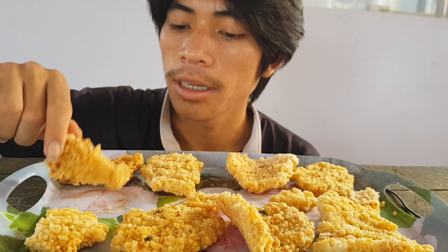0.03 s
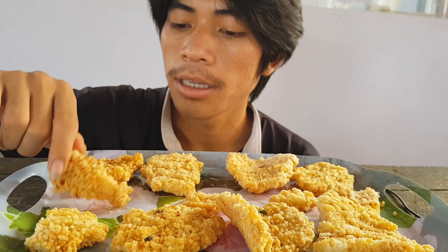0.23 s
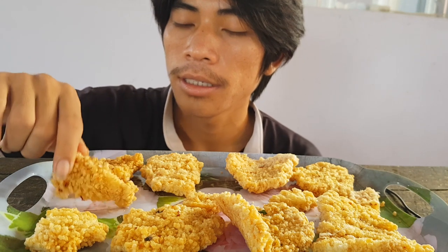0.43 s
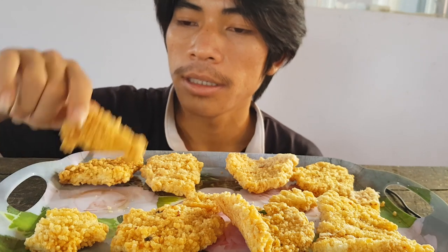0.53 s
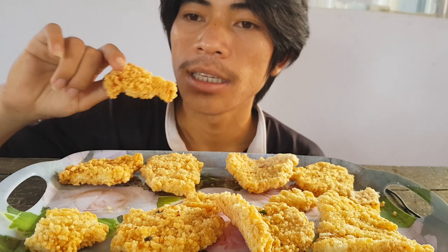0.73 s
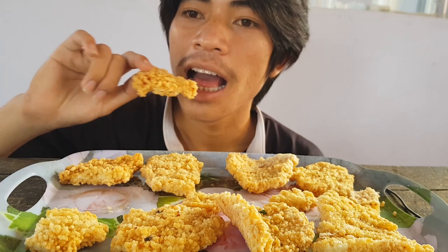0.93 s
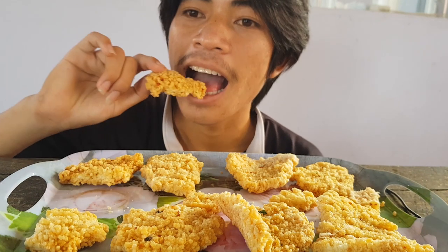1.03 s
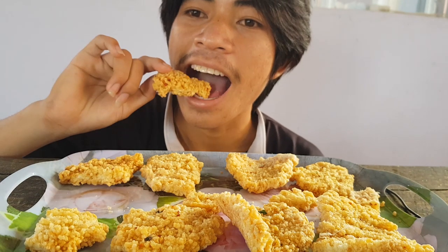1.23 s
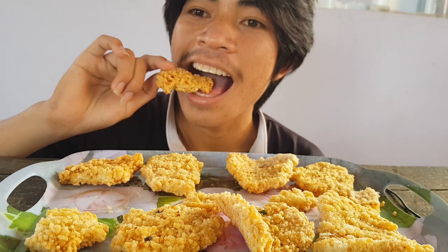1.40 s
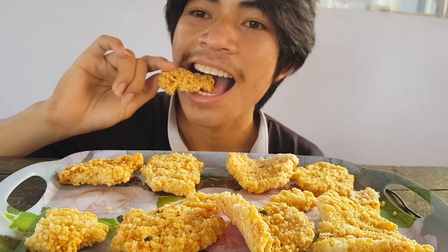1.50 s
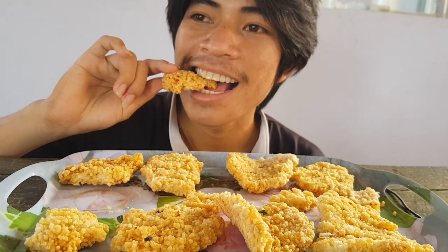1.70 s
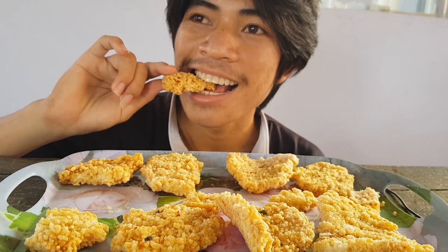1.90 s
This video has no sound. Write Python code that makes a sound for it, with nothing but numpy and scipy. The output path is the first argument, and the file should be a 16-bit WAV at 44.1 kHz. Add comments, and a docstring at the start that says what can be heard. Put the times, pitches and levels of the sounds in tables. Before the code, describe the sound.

A hard crispy piece of food raps a tray twice, very close and overloaded, with a short clattering ring and table thud; after a quiet pause, teeth crunch into the crust in a small room.

```python
"""In a small room, a crisp rice cake is knocked twice on a tray close to the microphone, overloading it.
Each blow snaps, rings the tray and the table as struck modes, and leaves a tail of dying noise bands.
Then the cake is lifted and bitten: grains of noise fizz as crust under the teeth, and a quick run of
short noise bursts cracks it, each ringing against the teeth and in the open mouth.
Around this lie a quiet hiss, a low rumble, a faint hum, small ticks and the rustle and bumps of handling."""
import sys
import numpy as np
from scipy import signal
from scipy.fft import rfft, irfft
from scipy.io import wavfile

SR = 44100
rng = np.random.default_rng(int(sys.argv[2]) if len(sys.argv) > 2 else 0)


def unload_audio(sound):
    """Save the sound as a 16-bit wav file, at the path given as the first command line argument."""
    columns = np.transpose(np.atleast_2d(sound))
    # keep every value between -1 and 1, then stretch to whole-number steps
    steps = np.round(np.clip(columns, -1, 1) * 32767)
    wavfile.write(sys.argv[1], SR, steps.astype(np.int16))


N = 85995
T = np.arange(N) / SR  # time [s]


def from_db(db):
    """Decibels to gain."""
    return 10 ** (np.asarray(db) / 20)


def rms_one(x):
    """Scale to rms 1."""
    return x / np.sqrt(np.mean(x ** 2) + 1e-20)


def level(rows):
    """A curve of (time [s], level [dB]) as gain at every sample."""
    return from_db(np.interp(T, *np.transpose(rows)))


def at_hz(rows, hz, axis=1):
    """Read a column of a table on a log-frequency axis."""
    rows = np.array(rows)
    return np.interp(np.log(hz), np.log(rows[:, 0]), rows[:, axis])


def delayed(x, s):
    """The sound x, started at time s."""
    return np.concatenate([np.zeros(max(int(s * SR), 0)), x])[:N]


def decay(s, t60):
    """Exponential decay by 60 dB in t60 seconds."""
    return np.exp(-np.log(1000) * s / t60)


def build_up(rise_s):
    """A resonance gathers energy: an exponential approach to 1."""
    return 1 - np.exp(-T / rise_s)


def mode(hz, t60):
    """A struck mode: a decaying sine whose envelope starts at 1."""
    return np.sin(2 * np.pi * hz * T) * decay(T, t60)


def white_noise():
    """White noise of rms 1."""
    return rng.standard_normal(N)


def noise_pair():
    """Two independent white noises of rms 1."""
    return rng.standard_normal((2, N))


def filtered(x, order, hz, kind):
    """Butterworth filter."""
    return signal.sosfilt(signal.butter(order, hz, kind, fs=SR, output="sos"), x)


def coloured(x, spectrum):
    """Causal (minimum-phase) filter with this relative spectrum; white noise keeps its level."""
    hz = np.maximum(np.arange(N + 1) * SR / (2 * N), 1)
    gain = rms_one(from_db(at_hz(spectrum, hz)))
    # Folding the cepstrum onto positive time gives the minimum phase.
    cepstrum = irfft(np.log(gain))
    cepstrum[1:N] *= 2
    cepstrum[N + 1:] = 0
    response = np.exp(rfft(cepstrum))
    return irfft(rfft(x, 2 * N) * response)[:N]


def dying_noise(table, white, hold_s):
    """Countless close modes: third-octave bands of noise, each held and then dying at its own rate."""
    out = 0
    edges = 43 * 2 ** (np.arange(27) / 3)
    for k, (low, high) in enumerate(zip(edges, edges[1:])):
        if high > table[0][0]:
            hz = np.sqrt(low * high)
            band = rms_one(filtered(white[k % 2], 3, [low, high], "band"))
            envelope = decay(np.maximum(T - hold_s, 0), at_hz(table, hz, axis=2))
            out = out + from_db(at_hz(table, hz)) * band * envelope
    return out


def grains():
    """A dense stream of tiny fractures of uneven size, at rms 1."""
    grains_per_s, spread_db = 10000, 2.9
    sizes = from_db(spread_db * np.minimum(rng.exponential(1, N), 5)) * rng.choice([-1, 1], N)
    return rms_one(sizes * (rng.random(N) < grains_per_s / SR))


def fracture(length_s):
    """A burst of micro-clicks, as of a crack through crust: noise that dies within milliseconds."""
    burst = white_noise() * np.exp(-T / length_s)
    energy = length_s * SR / 2
    return burst * np.sqrt(energy / np.sum(burst ** 2))


# Steady hiss of the quiet room: (frequency [Hz], relative density [dB per Hz])
AIR_COLOUR = [(100, -13), (220, -22), (320, -18), (550, -26), (800, -28.5), (1100, -32.5), (2200, -31.5),
              (3200, -25.5), (5000, -26), (8000, -33), (15500, -46)]


def room_hiss():
    """The faint steady hiss of the quiet room is shaped noise."""
    return from_db(-66) * coloured(white_noise(), AIR_COLOUR)


# Low rumble before the microphone's low cut: (time [s], level [dB])
RUMBLE_LEVEL = [(0, -65.5), (0.15, -104.5), (0.4, -55), (0.72, -61.5), (0.82, -64.5), (1.07, -58),
                (1.3, -69), (1.6, -72.5), (1.95, -56.5)]
# Its colour: (frequency [Hz], relative density [dB per Hz])
RUMBLE_COLOUR = [(25, -30.5), (50, -14), (75, 1), (110, -21.5), (200, -23.5), (400, -29.5), (800, -32),
                 (2000, -45)]


def rumble():
    """Low shaped noise rises and falls."""
    return level(RUMBLE_LEVEL) * coloured(white_noise(), RUMBLE_COLOUR)


# A dull noise dying from the start: (frequency [Hz], level [dB], t60 [s])
SETTLING = [(100, -64, .5), (170, -66, .7), (404, -65, .8), (900, -70, .35), (1399, -69, .7),
            (2202, -89, .5)]


def settling():
    """A dull noise dies away at the start, each band at its own rate."""
    return dying_noise(SETTLING, noise_pair(), 0)


# Faint low hum: (time [s], frequency [Hz], level [dB])
HUM_PATH = [(1.36, 336.5, -81.5), (1.44, 344.6, -67.5), (1.52, 340.3, -69), (1.57, 338, -77),
            (1.62, 310, -60.5), (1.67, 313, -90), (1.75, 311.4, -76), (1.95, 299, -56)]


def hum():
    """A faint low sine drifts in pitch while its level swells, dips and wavers irregularly."""
    waver_depth, waver_hz = 0.39, 25
    s, hz, db = np.transpose(HUM_PATH)
    waver = rms_one(filtered(white_noise(), 2, waver_hz, "low"))
    tone = np.sqrt(2) * np.sin(2 * np.pi * np.cumsum(np.interp(T, s, hz)) / SR)
    return (T > s[0]) * from_db(np.interp(T, s, db)) * (1 + waver_depth * waver) * tone


# Soft rustle of the hand over the tray: (time [s], level [dB])
RUSTLE_LEVEL = [(0, -78), (0.08, -71), (0.17, -63), (0.205, -52), (0.24, -61), (0.40, -69), (0.62, -68.5),
                (0.75, -88.5)]
# Its colour: (frequency [Hz], relative density [dB per Hz])
RUSTLE_COLOUR = [(200, -2), (700, -5), (1500, -10.5), (3000, -11.5), (5000, -1), (7500, -4), (12000, -20.5),
                 (15000, -26.5)]


def rustle():
    """The hand rustles over the tray as a stream of coloured grains."""
    end_s = 0.9
    return (T < end_s) * level(RUSTLE_LEVEL) * coloured(grains(), RUSTLE_COLOUR)


# Dull bumps of the hand and jaw: (time [s], level [dB], frequency [Hz])
BUMPS = [(0.625, -40.5, 72), (1.77, -32, 55), (1.829, -37.5, 50.8)]


def bumps():
    """The hand and jaw bump softly: low modes that build up and die."""
    t60_s, rise_s = 0.15, 0.01
    out = 0
    for s, db, hz in BUMPS:
        out = out + delayed(from_db(db) * mode(hz, t60_s) * build_up(rise_s), s)
    return out


# Small ticks: crumbs, light touches before the blows and a click of the lips:
# (time [s], level [dB], centre frequency [Hz])
SMALL_TICKS = [(0.173, -50.5, 4550), (0.207, -28, 2496), (0.2335, -34, 7500), (0.235, -45, 7400),
               (0.356, -58, 4940), (0.4103, -29, 2107), (1.1622, -50, 8000)]


def small_ticks():
    """Crumbs, light touches before the blows and a click of the lips: short bursts, each in its own band."""
    length_s, width = 0.002, 0.28  # width as a share of the centre frequency
    out = 0
    for s, db, hz in SMALL_TICKS:
        edges = [hz / (1 + width / 2), hz * (1 + width / 2)]
        make_up = np.sqrt(SR / (np.pi * hz * width))  # a narrow band passes less energy
        tick = filtered(fracture(length_s), 2, edges, "band") * make_up
        out = out + delayed(from_db(db) * tick, s)
    return out


# Room tail, relative to the blow: (frequency [Hz], level [dB], t60 [s])
ROOM_TAIL = [(61, -52, .23), (150, -44, .38), (410, -41, .4), (850, -52, .45), (1600, -47.5, .48),
             (2400, -47.5, .47), (3600, -52, .8), (4900, -52, .7), (5900, -65, .75), (7140, -65.5, .85),
             (10913, -68.5, .33), (15000, -74, .3)]
# Resonances lingering in that tail: (frequency [Hz], level [dB], t60 [s])
ROOM_MODES = [(282, -41, .42), (462, -39, .42), (545, -41, .38), (1252, -46, .35), (1785, -48, .3)]


def room_tail():
    """The small room answers a blow with dying noise and a few lingering modes."""
    lingering = sum(from_db(db) * mode(hz, t60) for hz, db, t60 in ROOM_MODES)
    diffuse = dying_noise(ROOM_TAIL, noise_pair(), 0)
    return (lingering + diffuse) * build_up(0.004)


def table_boom():
    """The table under the tray booms as one low mode that builds up slowly."""
    return from_db(-23) * mode(77.5, 0.29) * build_up(0.012)


def tray_thud():
    """The heavy thud of the tray against the table: a low sine under a short hump."""
    hz, length_s = 218, 0.012
    hump = np.sin(np.pi * np.sqrt(np.clip(T / length_s, 0, 1)))
    return from_db(-5.5) * np.sin(2 * np.pi * hz * T) * hump


# Tray modes, relative to the blow:
# (frequency [Hz], level at the first spot [dB], level at the second spot [dB], t60 [s])
TRAY_MODES = [(123, -22.5, -23.5, .15), (165, -16.5, -11, 0.11), (197, -20, -23.5, 0.069),
              (252, -16.5, -15, 0.13), (296, -16, -22, 0.077), (339.9, -12.5, -22, .1),
              (409.6, -11, -8, 0.098), (438.7, -5.5, -9.5, 0.082), (568, -18, -16, .12),
              (681, -11, -24.5, .07), (742.5, -28, -23.5, 0.061), (867, -29, -15, .075),
              (1063, -14.5, -16, .07), (1112, -15.5, -13, 0.068), (1200, -30.5, -16, .06),
              (1265.3, -17, -15.5, .085), (1521, -18.5, -19.5, 0.071), (1709.4, -30.5, -16.5, .05),
              (1785, -14, -18, .055), (1900, -22.5, -14, 0.041), (1963, -12, -21.5, 0.058),
              (2193, -11.5, -7.5, .045), (2407, -27, -13.5, 0.028), (2624, -11, -11, .046),
              (2898, -11.5, -9.5, .04), (3326, -16.5, -19, .04), (3722, -8.5, -15.5, 0.039),
              (4166, -13.5, -16.5, .03), (4890, -16.5, -17, 0.046)]


def tray(spot):
    """The tray rings at once in its upper modes; its low modes build up and the thud follows late."""
    lag_s, push_s, push_below_hz = 0.0014, 0.0044, 620
    low, high = 0, 0
    for k, (hz, *spot_db, t60) in enumerate(TRAY_MODES):
        ring = from_db(spot_db[spot]) * mode(hz, t60)
        if hz < push_below_hz:
            low = low - ring
        else:
            high = high + (-1) ** k * ring  # alternate signs of motion
    return high + delayed(low * build_up(push_s) - tray_thud(), lag_s)


# Dense upper modes of tray and cake: (frequency [Hz], relative level [dB], t60 [s])
CLATTER = [(304.1, -19, 0.11), (450, -14, 0.047), (695, -21.5, 0.1), (1350, -19.5, 0.045),
           (2800, -19, 0.064), (4600, -16.5, .042), (5900, -27.5, .04), (9400, -42.5, .028),
           (14800, -51, 0.057)]


def clatter(pattern):
    """Tray and cake clatter: held, then dying noise with only a small share common to both blows."""
    hold_s, change = 0.0082, 0.94  # change: share of the pattern's power that is new at each blow
    white = np.sqrt(1 - change) * pattern + np.sqrt(change) * noise_pair()
    return dying_noise(CLATTER, white, hold_s)


# Snap of the cake's hard edge: (frequency [Hz], relative density [dB per Hz])
CONTACT_COLOUR = [(300, -2.5), (1800, 5.5), (4000, -7), (8000, -4), (15000, -23)]


def contact():
    """The hard edge of the cake snaps on contact: a coloured fracture."""
    return from_db(-9.5) * coloured(fracture(0.0015), CONTACT_COLOUR)


# Blows close to the microphone, each at another spot of the tray:
# (time [s], level [dB], clatter level [dB], table boom level [dB]), the last two relative to the blow
KNOCKS = [(0.2100, -1.5, -2, 0), (0.4149, 0, -2.5, -1.5)]


def knocks():
    """Each blow snaps on contact and rings the tray, the table under it and the room."""
    out, pattern, table = 0, noise_pair(), table_boom()
    for spot, (s, db, clatter_db, boom_db) in enumerate(KNOCKS):
        blow = contact() + tray(spot) + room_tail()
        blow = blow + from_db(clatter_db) * clatter(pattern)
        blow = blow + from_db(boom_db) * table
        out = out + delayed(from_db(db) * blow, s)
    return out


# Fine fizz of crust under pressure: (time [s], level [dB])
FIZZ_LEVEL = [(1.598, -76), (1.608, -57), (1.66, -51.5), (1.72, -53), (1.79, -53), (1.83, -54.5),
              (1.868, -58.5), (1.90, -47.5), (1.93, -45.5), (1.95, -53)]
# Its colour: (frequency [Hz], relative density [dB per Hz])
FIZZ_COLOUR = [(120, -13.5), (200, -8), (320, -1.5), (500, -10.5), (850, -9.5), (1600, -6.5), (2400, -4),
               (4000, -2.5), (5200, -5), (6700, -7.5), (8200, -14), (11000, -24), (15500, -29)]


def fizz():
    """The crust fizzes under the teeth: a dense stream of coloured grains."""
    return level(FIZZ_LEVEL) * coloured(grains(), FIZZ_COLOUR)


# Bright ring of crust against teeth: (frequency [Hz], relative level [dB], t60 [s])
TOOTH_MODES = [(5460, 1.5, 0.0057), (5900, 2, 0.0051), (6380, 5, 0.0053), (7150, -14, 0.0066)]


def tooth_ring():
    """Crust against teeth rings in a few bright, very short modes of alternating sign."""
    return sum((-1) ** k * from_db(db) * mode(hz, t60) for k, (hz, db, t60) in enumerate(TOOTH_MODES))


def mouth_ring():
    """The open mouth cavity rings as one mode that builds up quickly."""
    return mode(1423, 0.016) * build_up(0.00026)


# The crust cracks under the teeth: (time [s], level [dB], mouth ring [dB], tooth ring [dB], length [s]),
# both rings relative to the crack
CRACKS = [(1.679, -55, -20, 9, 0.00082), (1.692, -46, -26, 6, 0.0014), (1.7315, -50, -6, 5.5, 0.00081),
          (1.7897, -44.5, -14, 5, 0.00087), (1.7988, -43, -4, 7.5, 0.00042),
          (1.8001, -36.5, -11.5, -1.5, .0006), (1.8766, -23, -18, 3.5, 0.0049),
          (1.8776, -14.5, 3.5, -28, .0016), (1.8803, -27.5, -4, 3, 0.0016), (1.8889, -36.5, 3, 9, 0.00028),
          (1.9024, -32.5, 2, 1, .0011), (1.9066, -35.5, -3, 4.5, 0.00073), (1.9137, -21, -6, -6, 0.002),
          (1.9143, -30.5, -5, -1, 0.0006), (1.916, -25.5, -8, 2, 0.0022),
          (1.9226, -26.5, -0.5, -2, 0.00076), (1.9273, -21.5, 0.5, -12, 0.00078)]
# Colour of a fracture: (frequency [Hz], relative density [dB per Hz])
CRACK_COLOUR = [(200, -24.5), (600, -8), (1100, -2), (2100, -1.5), (3000, 6.5), (3900, 1.5), (4700, 2.5),
                (5300, -14), (6500, 3.5), (8500, -13.5), (9500, -15), (11300, -25.5), (13300, -19),
                (15500, -16)]


def cracks():
    """The crust gives way in fractures that ring against the teeth and in the mouth cavity."""
    cavity, teeth = mouth_ring(), tooth_ring()
    snaps, rings = 0, 0
    for s, db, mouth_db, tooth_db, length_s in CRACKS:
        snaps = snaps + delayed(from_db(db) * fracture(length_s), s)
        ring = from_db(mouth_db) * cavity + from_db(tooth_db) * teeth
        rings = rings + delayed(from_db(db) * ring, s)
    return coloured(snaps, CRACK_COLOUR) + rings


def scene():
    """All sources are central; a faint side reflection and each microphone's own hiss widen them."""
    background = room_hiss() + rumble() + settling() + hum()
    small_sounds = rustle() + bumps() + small_ticks()
    bite = fizz() + cracks()
    mid = background + small_sounds + knocks() + bite
    side = from_db(-38.5) * delayed(mid, 0.003)
    mic_hiss = from_db(-86) * noise_pair()
    return np.array([mid + side, mid - side]) + mic_hiss


def record(dry):
    """The microphone sheds the deepest bass, overload clips hard, and the top is cut."""
    low_cut_hz, clip_level, stop_hz = 63, 1.0, 17100
    lean = filtered(dry, 2, low_cut_hz, "high")
    clipped = np.clip(lean, -clip_level, clip_level)
    top_cut = signal.cheby2(14, 75, stop_hz, fs=SR, output="sos")  # 75 dB down from stop_hz upwards
    return signal.sosfilt(top_cut, clipped)


dry = scene()
out = record(dry)
unload_audio(out)
```